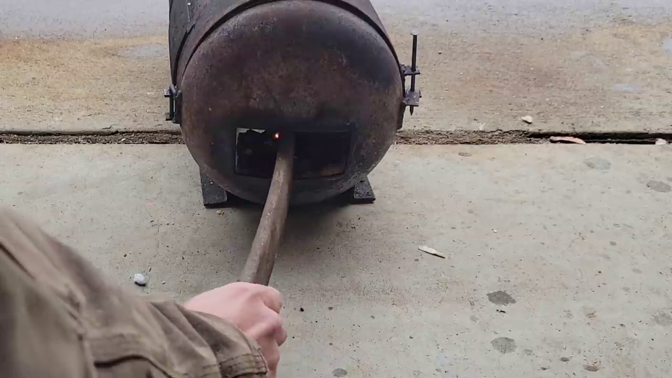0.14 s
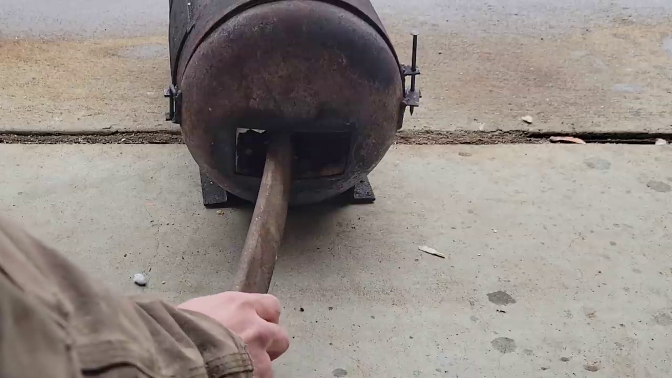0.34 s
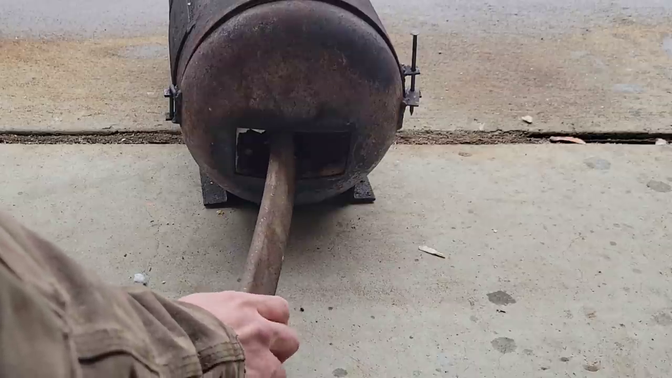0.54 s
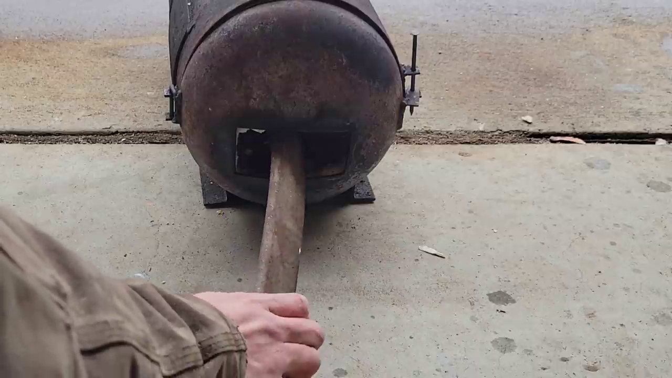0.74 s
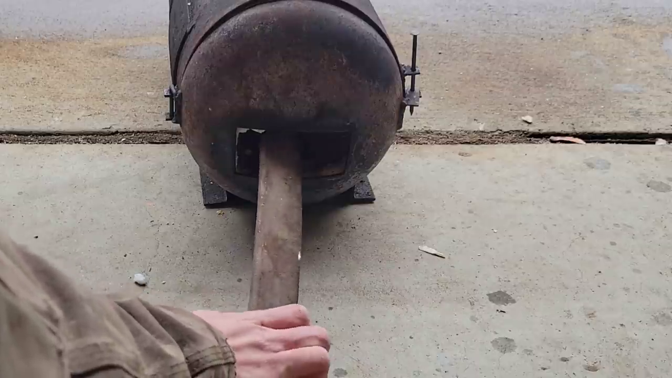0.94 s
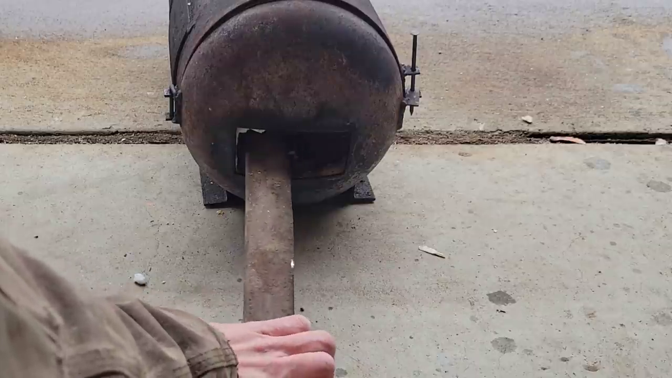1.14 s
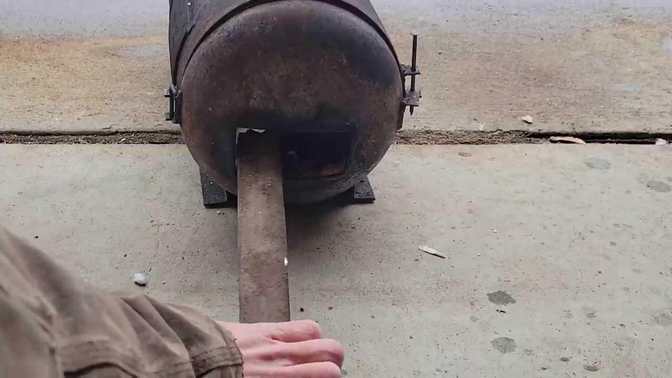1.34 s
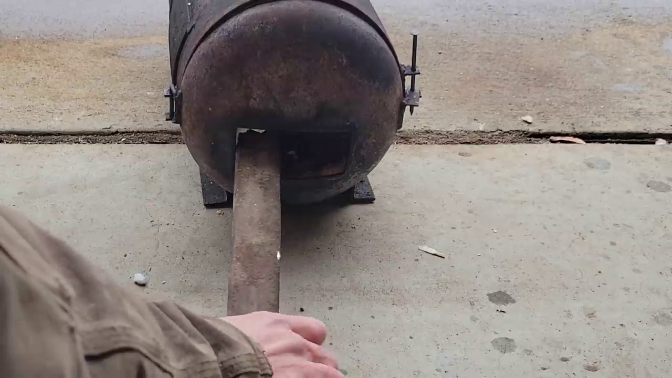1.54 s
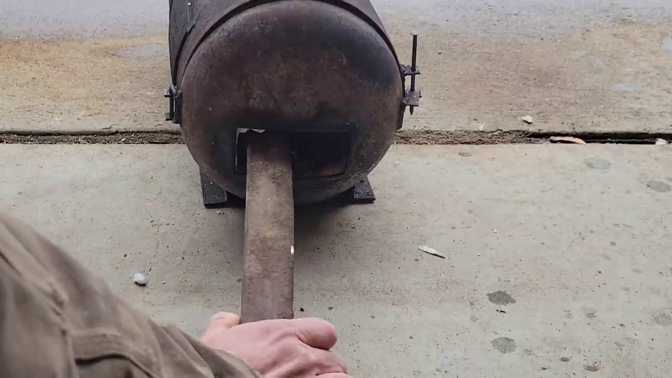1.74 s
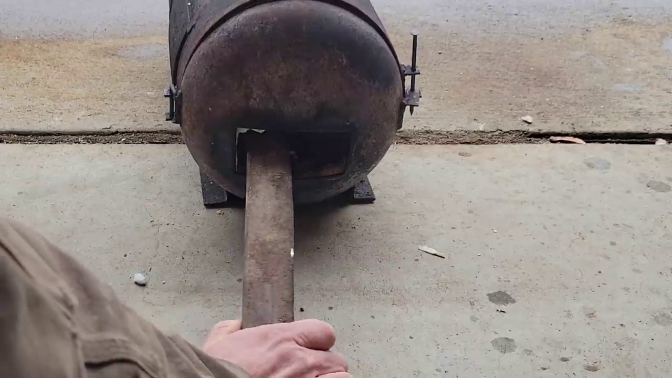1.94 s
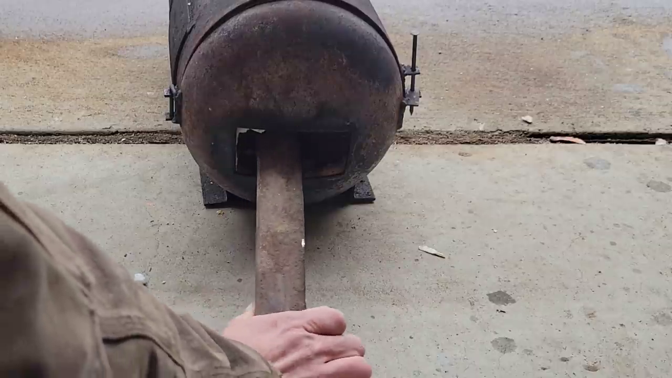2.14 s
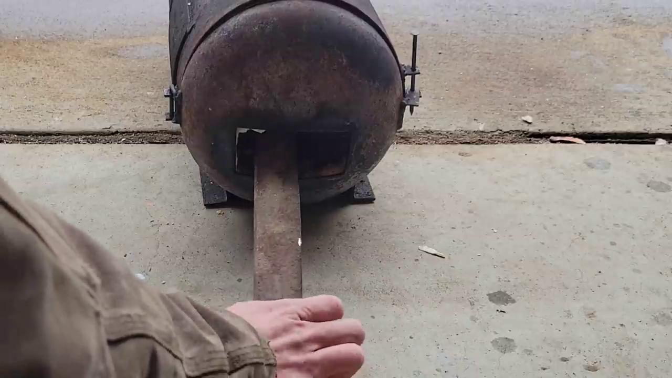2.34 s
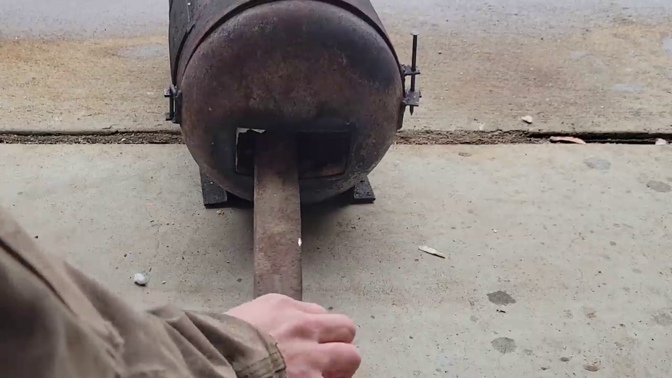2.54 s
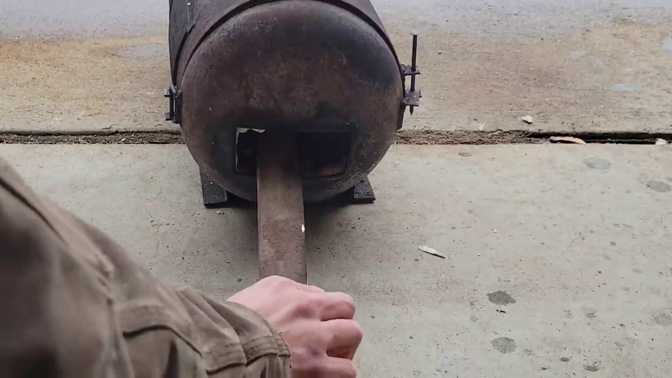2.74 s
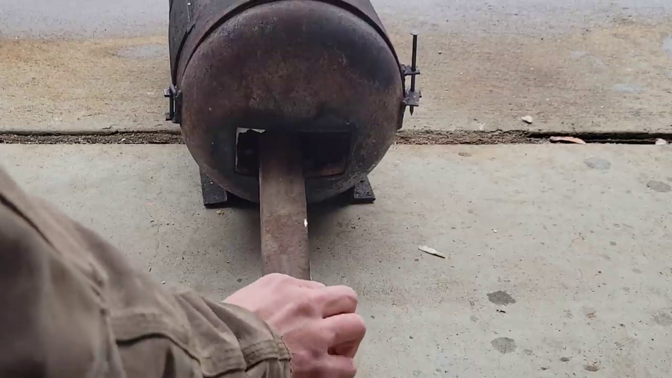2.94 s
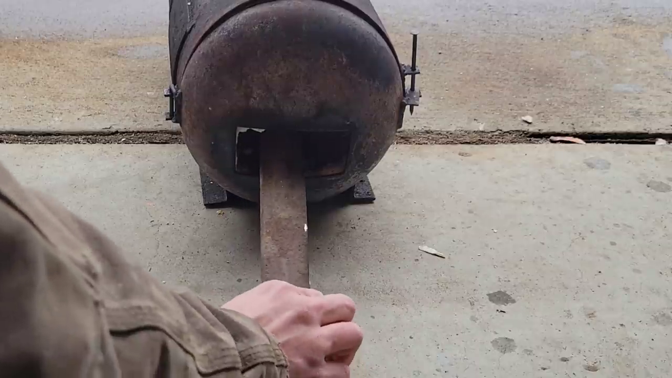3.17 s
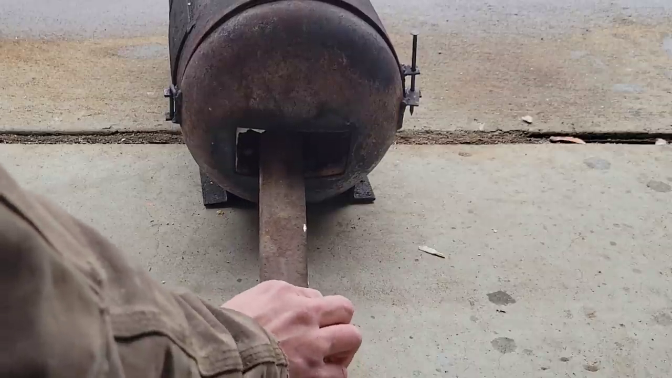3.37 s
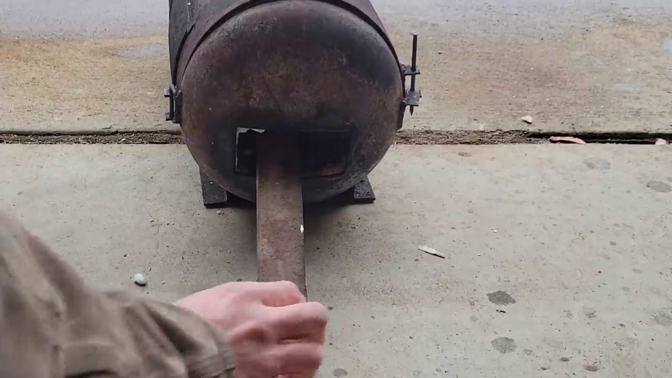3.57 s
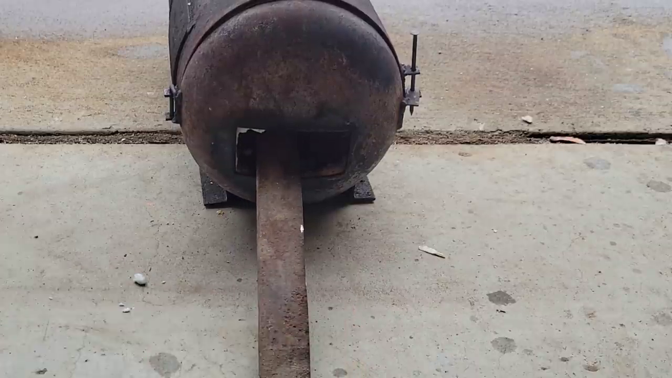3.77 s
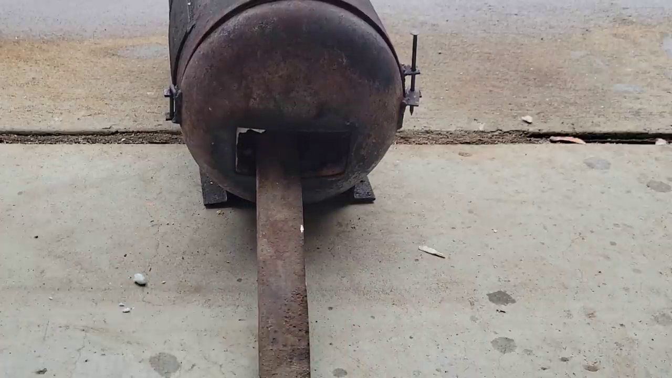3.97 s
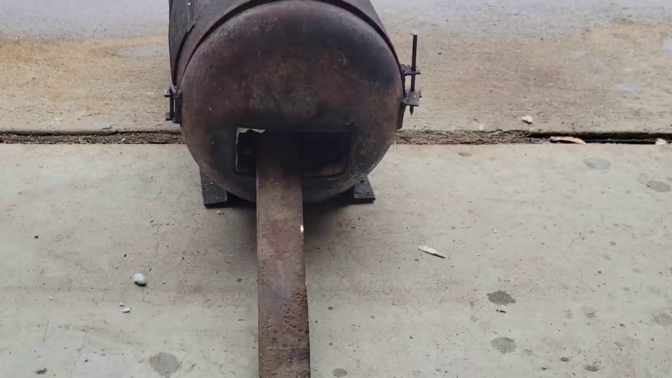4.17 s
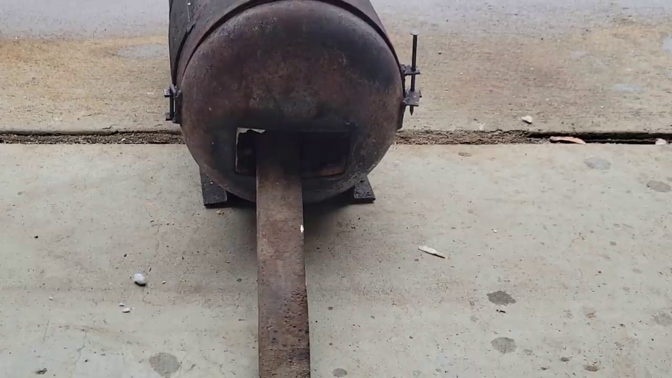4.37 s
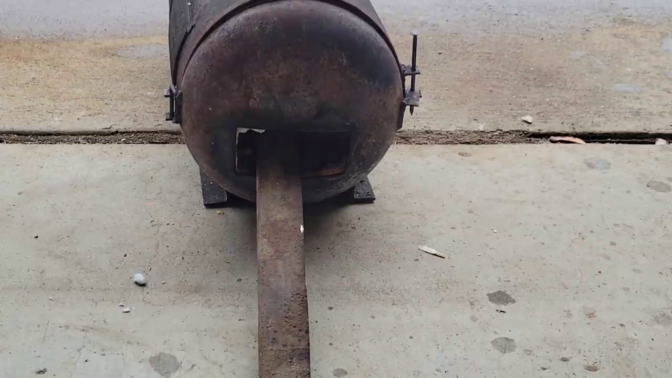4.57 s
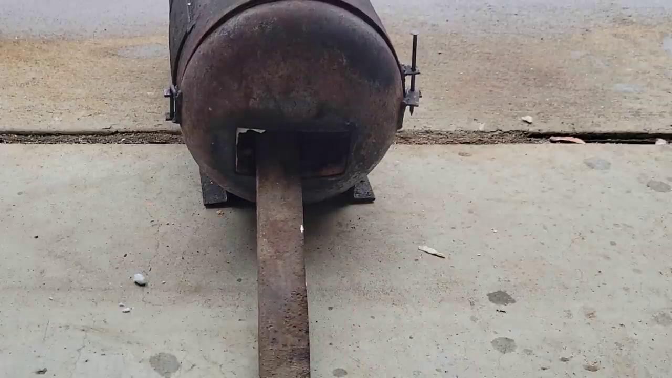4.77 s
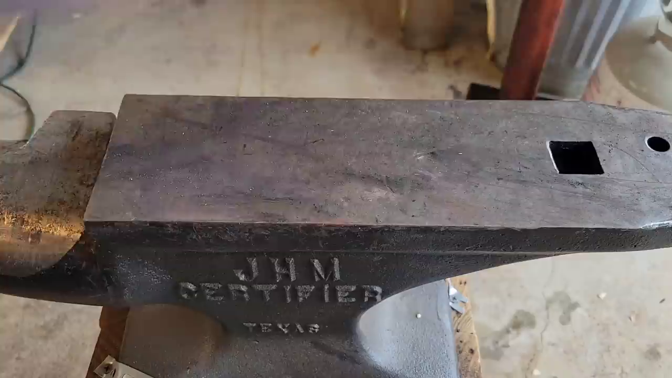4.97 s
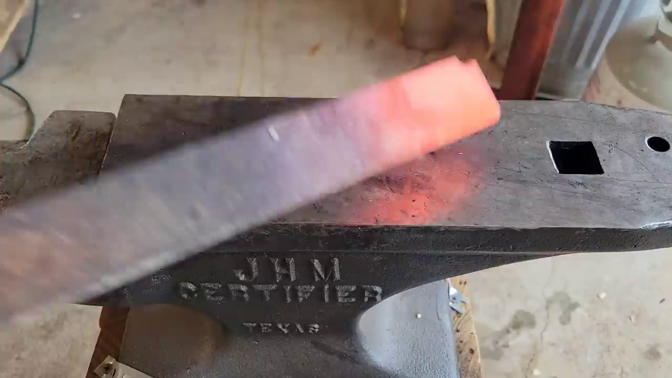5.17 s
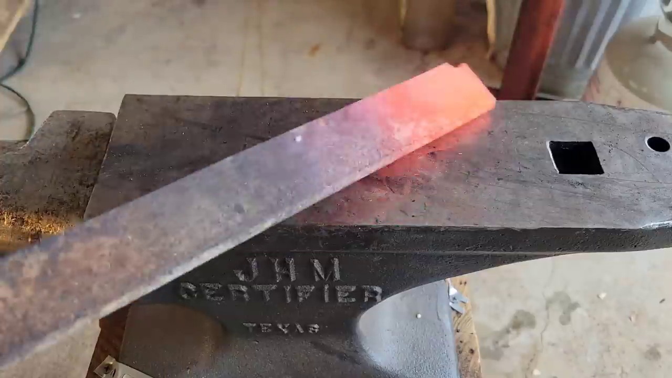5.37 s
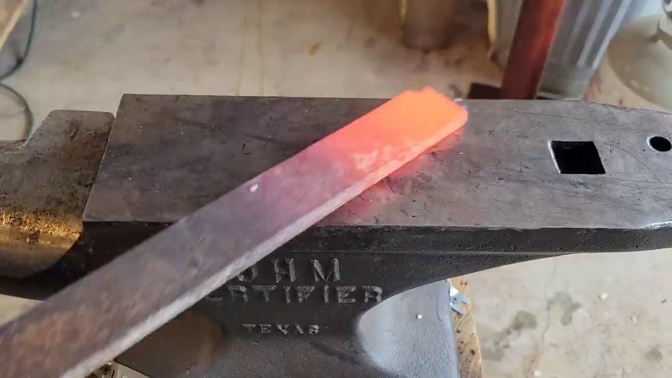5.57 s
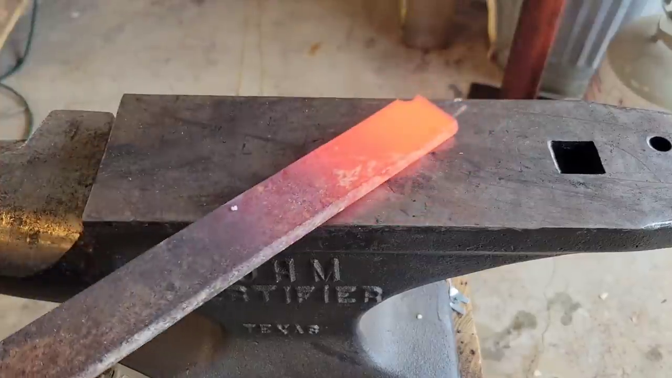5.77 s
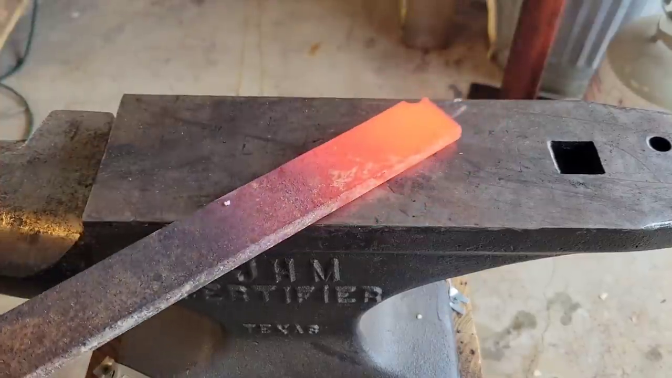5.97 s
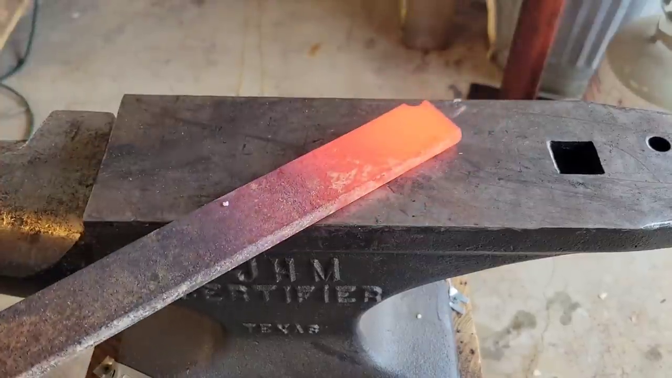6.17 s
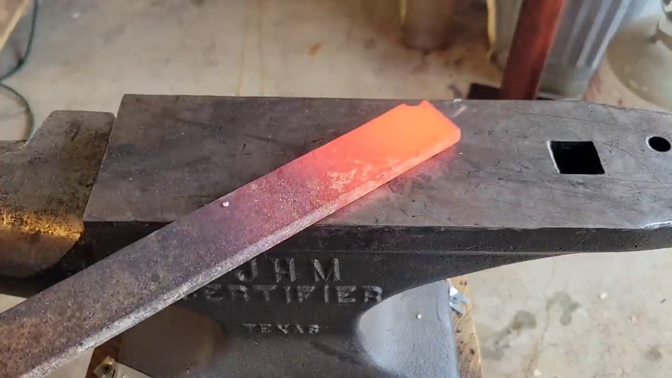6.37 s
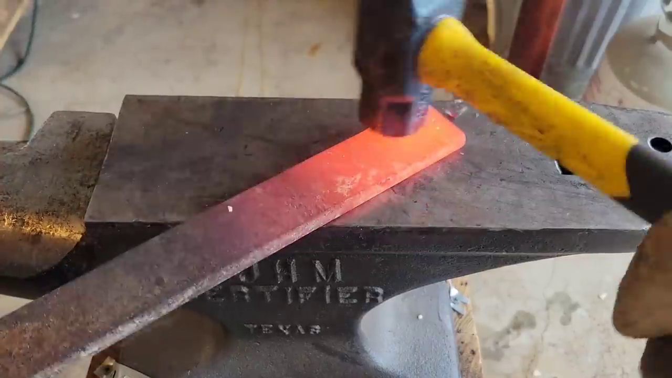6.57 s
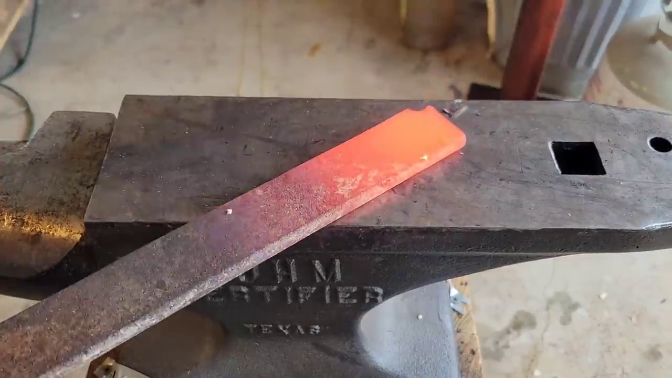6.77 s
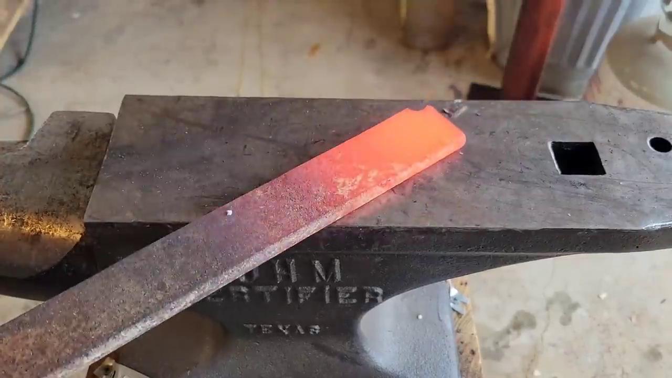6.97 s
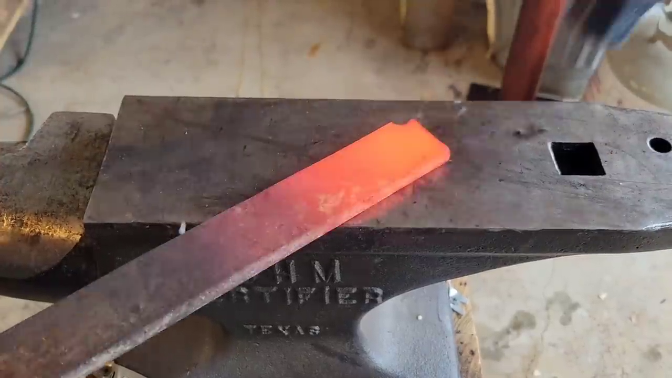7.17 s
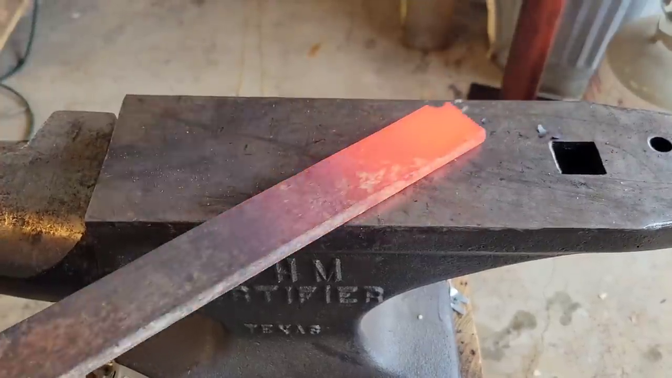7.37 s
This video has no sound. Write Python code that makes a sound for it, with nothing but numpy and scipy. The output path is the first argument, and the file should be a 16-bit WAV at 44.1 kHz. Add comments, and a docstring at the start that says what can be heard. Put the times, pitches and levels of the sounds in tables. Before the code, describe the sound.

Steady burner roar and hiss with metal scrapes, an abrupt cut to a quieter workshop, a bar clinking down and two loud hammer strikes.

```python
"""A gas forge roars and hisses close by while a flat steel bar scrapes, knocks and squeals in its mouth.
Then we stand at the anvil with the forge further off; the hot bar is laid down and struck twice.
Flame and scrape are coloured noise; bar and anvil are decaying modes, set off by catches and blows.
The anvil rings on, one high note wavering, and the phone's limiter ducks the workshop under each blow."""
import sys
import numpy as np
from scipy import signal
from scipy.fft import rfft, irfft
from scipy.io import wavfile
from scipy.ndimage import uniform_filter1d

SR = 44100
rng = np.random.default_rng(int(sys.argv[2]) if len(sys.argv) > 2 else 0)


def bounce(signal):
    """Save signal as a 16-bit WAV file at the path given by the first command-line argument."""
    frames = np.transpose(np.atleast_2d(signal))
    limited = np.clip(frames, -1, 1)
    pcm = np.round(limited * 32767).astype(np.int16)
    wavfile.write(sys.argv[1], SR, pcm)


N = 327222
T = np.arange(N) / SR
FREQS = np.fft.rfftfreq(N, 1 / SR)

MOVE_S = 4.961  # the listener is at the forge before this time, at the anvil after it
# airy rush of the exhaust: it swells once as the arm leaves the mouth, then eases
RUSH_DB, RUSH_SWELL_DB, RUSH_PEAK_S, RUSH_WIDTH_S = -82, 14.5, 4.35, 0.69
ECHO_SPACING_HZ, ECHO_RIPPLE_DB = 14, 3  # reflections from floor and walls colour the flame
# in every push the pressure comes on, grows to the end of the stroke and lets go
PUSH_ATTACK_S, PUSH_GROWTH_DB, PUSH_RELEASE_S = 0.0031, 12.5, 0.018
SLIDE_RASP_DB = -2  # rasp over ring in a slide
CATCHES_PER_S = 1200  # tiny stick-slip catches of rust on the lining
SQUEAL_WIDTH_HZ = 17  # unsteadiness of a squealing mode
SPREAD_DB, SPREAD_DB_PER_OCTAVE = -7.5, 4.5  # side minus mid of the bar's modes at 2 kHz, and its rise
KNOCK_RISE_S = 0.0076
TAP_CHATTER_S, TAP_T60_S = 0.0062, 0.14  # the bar buzzes on the face for a moment, then lies still
TAP_ROOM_DB, TAP_ROOM_T60_S = -13.5, 1
THUD_T60_S, PING_T60_S = 0.063, 0.08
SCATTER_PER_S = 25.5  # how fast the reflections of a ringing mode shift
NODE_DB = -40  # modes struck near a node hardly sound
BLOW_LEAD_IN_S, CRACK_T60_S, ROOM_FILL_S = 0.039, 0.14, 0.0041
THUMP_HZ, THUMP_T60_S = 367, 0.062  # the anvil jolts its stand
PARTIAL_SPACING_HZ, PARTIAL_SPREAD_DB = 21.96, 3  # the crowd of weak partials in clattering steel
CLATTER_T60_S = 0.27
CROWD_DB, CROWD_SPREAD_DB, CROWD_T60_S = -1.5, 4, 0.27  # weak ringing modes over the clatter's noise
NOTE_HZ = 3591  # the anvil's wavering note
TOP_HZ = 15650  # where the phone cuts the treble

# modes of anvil, stand and hammer, plus the workshop floor's hum at 238 Hz that rings along with them:
# pitch_hz, relative level_db, t60_s, left_minus_right_db, side_minus_mid_db
ANVIL_MODES = [(238, -6, 1.9, -2, -12), (368, -6, .25, 0, -6), (1329, 9, .6, -1, 10),
               (1445, -13.5, 1.9, 4, 3), (1598, -14, .25, 0, -3), (2497, 1.5, .28, 7, -5),
               (2731, -1, .28, 6, -15), (2850, -7, .22, 4, -12), (3047, -3.5, .2, 7, 10),
               (3405, -3.5, .38, -7, -4), (3591, -2, 1.85, -9, 5), (3849, -14, .22, 0, 0),
               (4028, -7.5, .26, -7, 4), (4475, -16, .6, -4, -12), (5080, -13.5, .2, -5, -5),
               (5270, -15.5, .2, -3, -5), (5385, -16, 1.6, -7, 2), (5802, -6, .33, -6, -15),
               (6411, -9, .25, -4, -15), (6674, -3, .48, -5, -15), (7230, -19, .22, 0, -15),
               (7535, -15, .65, 0, -15), (7578, -17, .5, 0, -15), (10640, -23, .55, 6, -15),
               (11590, -27, .3, 0, -15), (11960, -25, .3, 3, -15), (12690, -21, .5, 3, -15),
               (14050, -28, .25, 3, -15), (14650, -21, .3, 5, -15), (15250, -27, .25, 3, -15)]
# colour of the bar's clatter in the room: frequency_hz, relative level_db (per Hz)
CLATTER_COLOUR = [(60, -2), (350, 14), (700, -5), (1000, -10), (1400, 7), (2000, -11), (2700, 8),
                  (4200, -3), (4700, -5), (5100, -5.5), (6500, -0.5), (8500, -17), (12000, -16),
                  (15500, -11)]


def undb(db):
    """Decibels to gain."""
    return 10 ** (np.asarray(db) / 20)


def unit(x):
    """Scale to rms 1."""
    return x / np.sqrt(np.mean(x ** 2))


def pan(db):
    """Left and right gains for a level difference, left minus right."""
    return undb(np.array([[db], [-db]]) / 2)


def noise(points):
    """Noise of rms 1 with a spectrum of (Hz, dB) points, falling away below the first and above the last."""
    hz, db = np.transpose(points)
    gain = undb(np.interp(np.log(FREQS + 1), np.log(hz), db))
    low_fall = np.minimum(FREQS / hz[0], 1) ** 2
    high_fall = np.minimum(hz[-1] / (FREQS + 1), 1) ** 10
    return unit(irfft(rfft(rng.standard_normal(N)) * gain * low_fall * high_fall, N))


def wide(points, side_db):
    """Stereo noise with a given side level over the middle."""
    middle = noise(points)
    side = undb(side_db) * noise(points) * np.array([[1], [-1]])
    return (middle + side) / np.sqrt(1 + undb(side_db) ** 2)


def walk(rate):
    """Smooth random wander of spread 1, up to about `rate` turns a second."""
    return unit(irfft(rfft(rng.standard_normal(N)) * np.exp(-(FREQS / rate) ** 2), N))


def ripple(x, spacing_hz, spread_db):
    """Gather a noise into close, randomly strong peaks and scale it to rms 1."""
    peaks_db = spread_db * rng.standard_normal(3000)
    gain = undb(np.interp(FREQS, spacing_hz * np.arange(len(peaks_db)), peaks_db))
    return unit(irfft(rfft(x) * gain, N))


def resonate(peaks):
    """Turbulence ringing in steep-sided (Hz, width, dB) resonances."""
    response = 0
    for hz, width, db in peaks:
        resonance = 1j * FREQS * width / (hz ** 2 - FREQS ** 2 + 1j * FREQS * width)
        response = response + undb(db) * np.abs(resonance) ** 2
    return unit(irfft(rfft(rng.standard_normal(N)) * response, N))


def burst(start, rise, t60, hold=0):
    """Envelope that climbs 60 dB in `rise` up to its start, holds, then dies away."""
    before, after = (start - T) / rise, (T - start - hold) / t60
    return 1e-3 ** np.clip(np.maximum(before, after), 0, 20)


def place(sound, start):
    """Put a short sound at its time."""
    return np.pad(sound, ((0, 0), (int(start * SR), N)))[:, :N]


def ring(modes, scatter, hold=0):
    """Up to a second of ringing, kept up for `hold` s; shifting reflections fade short modes raggedly."""
    longest = max(mode[2] for mode in modes)
    t, out = T[:int(SR * min(longest + hold, 1))], 0
    for hz, db, t60, pan_db, side_db in modes:
        steps_by_ear = rng.standard_normal((2, 64, 2))
        echoes = np.array([np.interp(t * SCATTER_PER_S, np.arange(64), steps @ [1, 1j])
                           for steps in steps_by_ear])
        # long waves pass the smith undisturbed
        depth = scatter * np.exp(-t60) * min(hz / 2500, 1) ** 2
        direct = np.exp(1j * np.arctan(undb(side_db)) * np.array([[1], [-1]]))
        paths = (direct + depth * echoes) / np.sqrt(1 + depth ** 2)
        decay = np.log(1000) * np.maximum(t - hold, 0) / t60
        tone = np.exp(2j * np.pi * (hz * t + rng.random()) - decay)
        out = out + undb(db) * pan(pan_db) * np.sqrt(2) * (paths * tone).imag
    return out


def favour(modes, centre_hz, falloff_db):
    """The point of contact picks out the modes near one pitch; the others lose so many dB per octave."""
    return [(hz, db - falloff_db * abs(np.log2(hz / centre_hz)), *rest) for hz, db, *rest in modes]


def near_node(modes, node_hz, width_hz):
    """Mutes the modes that have a node at the point of contact."""
    return [(hz, db + NODE_DB * np.exp(-((hz - node_hz) / width_hz) ** 2), *rest)
            for hz, db, *rest in modes]


def forge_near():
    """The flame rumbles and booms in the chamber; the gas jet hisses and flutters; the exhaust rushes."""
    # flame at the forge mouth, shared by both ears and differing: frequency_hz, relative level_db (per Hz)
    roar = [(30, -20), (45, -49), (66, -1), (120, -2.5), (185, 4.5), (240, -5), (300, -14), (420, -18.5),
            (650, -18.5), (1000, -32.5), (1400, -43.5), (3000, -40.5), (4500, -51), (8000, -57.5)]
    roar_side = [(40, 8), (70, -5), (180, 9), (300, -4), (450, -7), (700, -6.5), (1400, -18), (3000, -24),
                 (5000, -23), (8000, -31)]
    # resonances of the forge chamber: centre_hz, width_hz, relative level_db
    chamber = [(185, 57.5, 5), (355, 12, -18.5)]
    # gas jet at the nozzle, then exhaust rush: frequency_hz, relative level_db (per Hz)
    jet_colour = [(6000, -92), (8500, -7.5), (9900, -2.5), (10450, 6.5), (11000, -1), (12200, 3),
                  (13100, 12), (14200, 4), (15700, 10)]
    exhaust = [(2500, 6), (4500, 4), (6500, -0.5), (11000, -15)]
    boom = undb(-41.0 + 0.62 * walk(5.4)) * resonate(chamber)
    flame = undb(-38.0) * ripple(noise(roar), ECHO_SPACING_HZ, ECHO_RIPPLE_DB)
    around = undb(-59.0) * noise(roar_side) * np.array([[1], [-1]])
    flutter = undb(-65.5 + 2.2 * walk(9.8) + 0.83 * walk(43))
    hiss = ripple(wide(jet_colour, side_db=-14.5), spacing_hz=62.0, spread_db=2.0)
    jet = flutter * hiss * pan(3.2)
    swell = np.exp(-((T - RUSH_PEAK_S) / RUSH_WIDTH_S) ** 2)
    rush = undb(RUSH_DB + RUSH_SWELL_DB * swell) * wide(exhaust, side_db=0.0)
    return (flame + boom + around) * pan(-0.82) + jet + rush * pan(0.44)


def bar_in_forge():
    """Short knocks and longer slides rasp on the lining and ring the bar; pressed hard, it squeals."""
    # bending modes of the bar lying in the forge: pitch_hz, relative level_db, t60_s, left_minus_right_db
    bar_modes = [(1090, -24, .08, 0), (1443, -9, .06, 0), (1800, -15, .025, 0), (1960, -11, .03, 0),
                 (2150, 5.5, .07, 0), (2260, -8, .04, 0), (2550, -14, .03, 0), (2870, -7, .04, 0),
                 (2980, -4, .05, 0), (3915, -17, .09, -2), (5000, -12, .12, -3), (5520, -27, .2, 0),
                 (6210, -19, .13, 0), (7550, -27, .12, 0), (8950, -30, .1, 0)]
    # rust grating on the forge lining: frequency_hz, relative level_db (per Hz)
    rasp_colour = [(500, 11), (1000, 6.5), (1500, 9), (2200, -4.5), (3000, 3), (3600, -8.5), (6000, -24.5),
                   (9000, -39), (14000, -39)]
    # the bar knocks against the forge mouth: start_s, rasp_db, rasp_tilt_db (per octave), ring_db, chatter_s,
    # favoured_hz (by the contact), falloff_db (per octave from there)
    knocks = [(0.067, -51.5, 8, -64, 0.025, 2700, 12), (.606, -63.5, 5, -70, 0.033, 2200, 5),
              (1.058, -49, -6, -52.5, 0.036, 1450, -2), (1.091, -40, -1, -34.5, 0.022, 2660, 12),
              (2.296, -51, 2.5, -52.5, 0.0069, 3000, 30), (3.136, -44.5, -5, -60.5, 0.022, 6200, 7)]
    # the bar is pushed along the forge floor: start_s, length_s, ring_db, favoured_hz, falloff_db (per octave)
    slides = [(0.962, 0.22, -60.5, 5000, 12), (1.316, 0.1, -66, 2100, 19), (2, 0.094, -55, 2320, 2.5),
              (2.71, 0.04, -62.5, 1500, -1)]
    # the bar squeals on the lining: start_s, length_s, level_db, favoured_hz, falloff_db (per octave)
    squeals = [(1.092, 0.024, -41.5, 2150, -3), (2.645, 0.07, -65.5, 4700, 20),
               (2.73, .035, -64.5, 4100, 37)]
    out, grit, t = 0, undb(1.2 * walk(110)), T[:SR // 4]

    def rasp(tilt_db):
        """Gritty noise, its colour tilted by so many dB per octave."""
        tilted = [(hz, db + tilt_db * np.log2(hz)) for hz, db in rasp_colour]
        return grit * ripple(wide(tilted, side_db=-9.5), spacing_hz=61.26, spread_db=6.5)

    for start, rasp_db, tilt_db, ring_db, chatter, centre_hz, falloff_db in knocks:
        modes = favour(bar_modes, centre_hz, falloff_db)
        out = out + place(bar_ring(modes, np.exp(-t / chatter), 2.2, ring_db), start)
        envelope = burst(start, rise=KNOCK_RISE_S, t60=np.log(1000) * chatter)
        out = out + undb(rasp_db) * envelope * rasp(tilt_db)
    scrape = rasp(0)
    for start, length, ring_db, centre_hz, falloff_db in slides:
        pressure = push(t, length)
        modes = favour(bar_modes, centre_hz, falloff_db)
        out = out + place(bar_ring(modes, pressure, 0, ring_db), start)
        out = out + undb(ring_db + SLIDE_RASP_DB) * place(pressure[None], start) * scrape
    for start, length, level_db, centre_hz, falloff_db in squeals:
        modes = favour(bar_modes, centre_hz, falloff_db)
        out = out + undb(level_db) * place(squeal(modes, length), start)
    return out


def bar_ring(modes, pressure, impact, level_db):
    """An impact, then tiny catches that follow the pressure, ring the bar's bending modes."""
    caught = rng.random(len(pressure)) < CATCHES_PER_S / SR
    catches = rng.standard_normal(len(pressure)) * caught * pressure
    catches[0] += impact
    spread_modes = [(*mode, ear_spread_db(mode[0])) for mode in modes]
    clink = signal.fftconvolve(ring(spread_modes, scatter=0.4), catches[None], axes=1)
    # level_db is the rms of the loudest 10 ms
    loudest = np.sqrt(uniform_filter1d(np.mean(clink ** 2, axis=0), size=441).max())
    return clink * undb(level_db) / loudest


def ear_spread_db(hz):
    """Side minus mid level of a mode of the bar: short waves reach the ears more out of step."""
    return SPREAD_DB + SPREAD_DB_PER_OCTAVE * np.log2(hz / 2000)


def push(t, length):
    """Pressure during one stroke: attack, growth, release."""
    growth = undb(PUSH_GROWTH_DB * np.minimum(t / length - 1, 0))
    release = np.exp(-np.maximum(t - length, 0) / PUSH_RELEASE_S)
    return np.minimum(t / PUSH_ATTACK_S, 1) * growth * release


def squeal(modes, length):
    """Steady stick-slip locks onto the bar's modes: they sing, a little unsteadily, until it lets go."""
    t, out = T[:SR // 4], 0
    for hz, db, t60, pan_db in modes:
        drift = np.cumsum(rng.standard_normal(len(t))) * np.sqrt(2 * np.pi * SQUEAL_WIDTH_HZ / SR)
        ears = np.arctan(undb(ear_spread_db(hz))) * np.array([[1], [-1]])
        decay = np.exp(-np.log(1000) * np.maximum(t - length, 0) / t60)
        envelope = np.minimum(t / PUSH_ATTACK_S, 1) * decay
        tone = np.sin(2 * np.pi * hz * t + uniform_filter1d(drift, size=60) + ears)
        out = out + undb(db) * pan(pan_db) * envelope * tone
    return out / np.sqrt(sum(undb(mode[1]) ** 2 for mode in modes) / 2)


def forge_far():
    """The same flame across the workshop: weaker, more diffuse, with the room's boom."""
    # flame from afar, shared by both ears and differing: frequency_hz, relative level_db (per Hz)
    far_roar = [(30, -44), (65, -10.5), (120, -4), (230, 3), (300, -5), (400, -16), (600, -25.5),
                (1000, -33.5), (1500, -38.5), (5000, -47.5), (8000, -50.5)]
    far_side = [(40, -42), (100, -15), (230, 1), (350, -1), (450, -11.5), (700, -11), (1100, -17.5),
                (2000, -28.5), (5000, -33.5), (8000, -44)]
    # resonances of chamber and workshop together: centre_hz, width_hz, relative level_db
    workshop = [(174, 26, -0.3), (254.6, 24, -0.72)]
    # gas jet from afar: frequency_hz, relative level_db (per Hz)
    far_jet = [(7000, -27), (10000, -2.5), (12800, 4.5), (14500, 13.5), (15700, 8.5)]
    boom = undb(-47.5 + 0.5 * walk(2.7)) * resonate(workshop)
    flame = undb(-44.5) * ripple(noise(far_roar), ECHO_SPACING_HZ, ECHO_RIPPLE_DB)
    around = undb(-54.5) * noise(far_side) * np.array([[1], [-1]])
    flutter = undb(walk(4.1))
    jet = undb(-67.5) * flutter * wide(far_jet, side_db=-22) * pan(0.93)
    return (flame + boom + around) * pan(-2.2) + jet


def bar_on_anvil():
    """Each touch of the bar clacks, thuds and clinks; the anvil answers faintly."""
    # modes of the hot bar, damped by the anvil's face: pitch_hz, relative level_db, t60_s, left_minus_right_db
    hot_bar = [(1540, -8, .04, 0), (1670, -4, .04, 0), (1900, -4, .04, 0), (2060, 0, .04, 0),
               (2355, 0, .09, 0), (2830, -3, .04, 0), (2930, -5, .07, 0), (3070, 0, .06, 0),
               (3380, 3, .07, -3), (3940, -5, .06, -3), (4130, -9, .05, -3), (4330, -7, .04, -3),
               (4505, 1, .06, -3), (5130, -7, .05, -3), (5815, -11, .11, -3), (6430, -14, .06, -3),
               (7200, -14, .05, 0)]
    # bar set down on the anvil: start_s, clack_db, thud_db, clink_db, anvil_ring_db,
    # favoured_hz (by the contact), falloff_db (per octave from there)
    taps = [(4.99, -60, -53.5, -72, -89, 3000, 0), (5.161, -82, -58.5, -85, -93, 3000, 0),
            (5.276, -48.5, -51.5, -38.5, -66.5, 3000, -6), (5.424, -58, -68, -45, -57, 2970, 8),
            (5.518, -55, -45.5, -73, -66.5, 3000, -4), (5.556, -68, -68, -62, -73, 2900, 33),
            (6.324, -71, -57, -82, -86, 3000, 0)]
    # clack and thud of the bar: frequency_hz, relative level_db (per Hz)
    clack_colour = [(800, -31), (1400, -5), (1850, -4), (2150, -4), (2380, -4), (2650, -7), (2950, 2),
                    (3400, -8), (3750, 0), (4300, -7.5), (5200, -6), (7500, -15), (10000, -60),
                    (15000, -38)]
    thud_colour = [(100, 1), (600, 0), (1200, -19), (4000, -21), (7500, -18), (12000, -45)]
    clack = ripple(wide(clack_colour, side_db=1.5), PARTIAL_SPACING_HZ, PARTIAL_SPREAD_DB)
    thud, out = wide(thud_colour, side_db=-3.0), 0
    anvil_modes = favour(ANVIL_MODES, centre_hz=2900, falloff_db=12)
    anvil = ring(near_node(anvil_modes, node_hz=2770, width_hz=120), scatter=0.56)
    chatter = np.exp(-T[:SR // 10] / TAP_CHATTER_S)
    for start, clack_db, thud_db, clink_db, anvil_db, centre_hz, falloff_db in taps:
        room = undb(TAP_ROOM_DB) * burst(start, rise=0.006, t60=TAP_ROOM_T60_S)
        buzz = burst(start, rise=0.025, t60=TAP_T60_S, hold=TAP_CHATTER_S)
        out = out + undb(clack_db) * clack * (buzz + room)
        out = out + undb(thud_db) * thud * (burst(start, rise=0.01, t60=THUD_T60_S) + room)
        clink = bar_ring(favour(hot_bar, centre_hz, falloff_db), chatter, 1.5, clink_db)
        out = out + place(clink, start) + undb(anvil_db) * place(anvil, start)
    return out * pan(-0.36)


def hammering():
    """Each blow crushes the scale: crack, ping, thump; the bar slaps and its clatter keeps the anvil ringing."""
    # hammer blows: start_s, crack_db, ring_db, clatter_db, clatter_s (that the bar keeps clattering),
    # node_hz (modes with a node under the hammer), node_width_hz, ping_hz (of the contact), ping_db, thump_db
    blows = [(6.515, -34, -32.5, -32.5, 0.038, 4850, 260, 5770, -39, -38),
             (7.11, -23.5, -38, -34.5, 0.022, 5986, 422, 5080, -31, -55)]
    # the bar slaps flat on the anvil just after each contact: start_s, level_db
    slaps = [(6.527, -22), (7.1135, -23)]
    # colour of the crack and the slap: frequency_hz, relative level_db (per Hz)
    crack_colour = [(40, -1), (150, 7), (400, 4), (900, 6), (1800, -1), (3500, -1.5), (5300, 1.5),
                    (6500, 1), (8500, -11), (12000, -13), (15500, -1)]
    crack = ripple(wide(crack_colour, side_db=-4), spacing_hz=70, spread_db=4)
    clatter = ripple(wide(CLATTER_COLOUR, side_db=-12.0), PARTIAL_SPACING_HZ, PARTIAL_SPREAD_DB)
    clatter = clatter * pan(-0.94) * undb(2.6 * walk(130))
    slap, partials = wide(crack_colour, side_db=2), crowd(count=70)
    out, ringing = 0, 0
    for blow, (slap_s, slap_db) in zip(blows, slaps):
        start, crack_db, ring_db, clatter_db, clatter_s = blow[:5]
        node_hz, node_width_hz, ping_hz, ping_db, thump_db = blow[5:]
        out = out + undb(crack_db) * burst(start, rise=BLOW_LEAD_IN_S, t60=CRACK_T60_S) * crack
        ping = np.sin(2 * np.pi * ping_hz * T)
        out = out + undb(ping_db) * burst(start, rise=BLOW_LEAD_IN_S, t60=PING_T60_S) * ping
        thump = np.sin(2 * np.pi * THUMP_HZ * (T - start)) * pan(10.0)
        out = out + undb(thump_db) * burst(start, rise=BLOW_LEAD_IN_S, t60=THUMP_T60_S) * thump
        out = out + undb(slap_db) * burst(slap_s, rise=0.01, t60=0.035) * slap
        fill = 1 - np.exp(-np.maximum(T - slap_s, 0) / ROOM_FILL_S)  # reflections build up
        clatter_envelope = fill * burst(slap_s, rise=0.02, t60=CLATTER_T60_S, hold=clatter_s)
        out = out + undb(clatter_db) * clatter_envelope * clatter
        weak_modes = ring(partials, scatter=0.8, hold=clatter_s)
        out = out + undb(clatter_db + CROWD_DB) * place(weak_modes, slap_s)
        anvil = ring(near_node(ANVIL_MODES, node_hz, node_width_hz), scatter=0.7, hold=clatter_s)
        ringing = ringing + undb(ring_db) * fill * place(anvil, slap_s)
    return out + waver_note(ringing)


def crowd(count):
    """Weak modes of bar and hammer, scattered over the clatter's colour, at a joint level of 0 dB."""
    chance = rng.standard_normal((count, 4))
    hz = np.linspace(600, TOP_HZ - 200, count) + 50 * chance[:, 0]
    db = np.interp(hz, *np.transpose(CLATTER_COLOUR)) + CROWD_SPREAD_DB * chance[:, 1]
    db = db - 10 * np.log10(np.sum(undb(db) ** 2))
    pan_db, side_db = 4 * chance[:, 2], 6 * chance[:, 3] - 4
    return list(zip(hz, db, np.full(count, CROWD_T60_S), pan_db, side_db))


def waver_note(ringing):
    """One long high note of the anvil swells and dips as it fades."""
    # change in the note's level: time_s, level_db
    note_waver = [(6.57, 0), (6.72, -4.5), (6.77, 2.5), (6.83, -2), (6.87, 5), (7.0, -13), (7.03, 0.5),
                  (7.06, -8), (7.15, 2), (7.22, -3), (7.29, 3.5)]
    note = irfft(rfft(ringing) * np.exp(-((FREQS - NOTE_HZ) / 80) ** 4), N)
    return ringing + note * (undb(np.interp(T, *np.transpose(note_waver))) - 1)


def scene():
    """First at the forge, then at the anvil."""
    at_anvil = np.clip((T - MOVE_S) / 0.0049, 0, 1)
    forge = (1 - at_anvil) * (forge_near() + bar_in_forge()) + at_anvil * forge_far()
    return forge + bar_on_anvil() + hammering()


def limiter(x, ceiling_db, release_db_per_s):
    """Turns down at once when the short-time power passes the ceiling and comes back slowly."""
    power = uniform_filter1d(np.mean(x ** 2, axis=0), size=400)
    over = np.maximum(10 * np.log10(np.abs(power) + 1e-12) - ceiling_db, 0)
    recovery = release_db_per_s * T
    return x * undb(recovery - np.maximum.accumulate(over + recovery))


def record(dry):
    """The phone limits the blows and cuts the top."""
    held = limiter(dry, ceiling_db=-29, release_db_per_s=3)
    top_cut = signal.ellip(10, 0.2, 80, TOP_HZ, fs=SR, output="sos")
    return signal.sosfilt(top_cut, held)


dry = scene()
out = record(dry)
bounce(out)
```